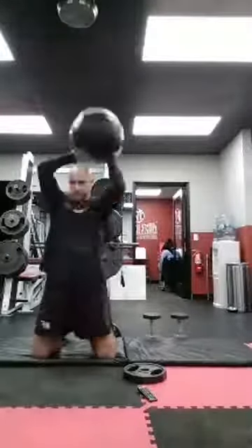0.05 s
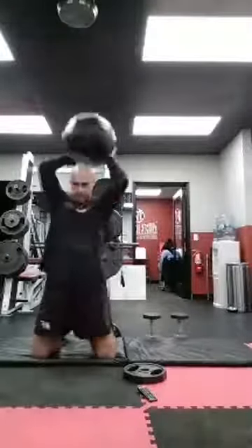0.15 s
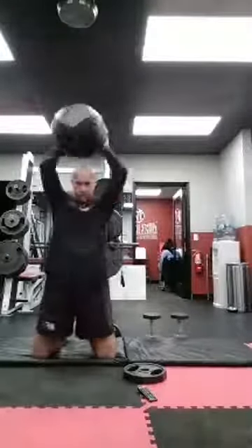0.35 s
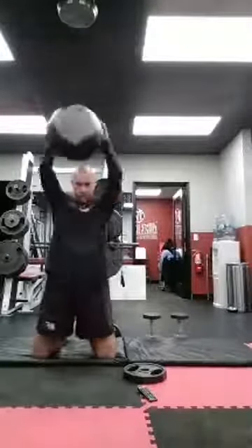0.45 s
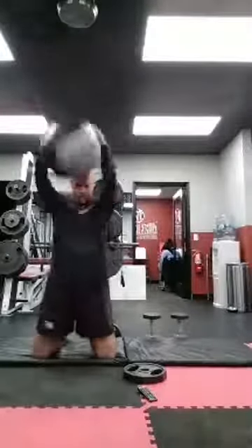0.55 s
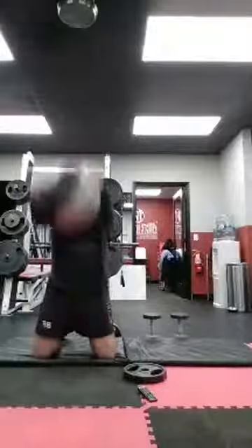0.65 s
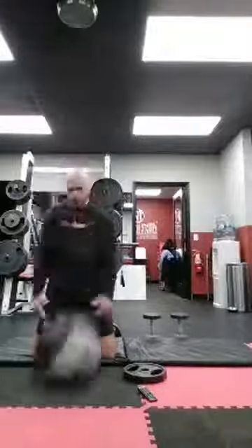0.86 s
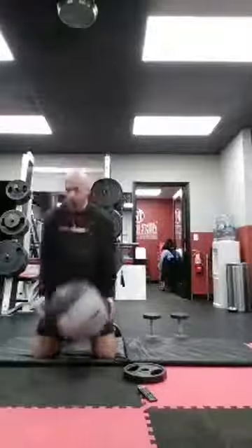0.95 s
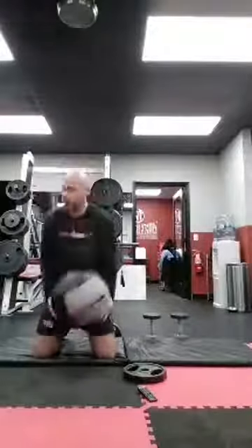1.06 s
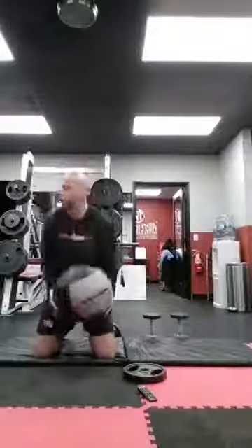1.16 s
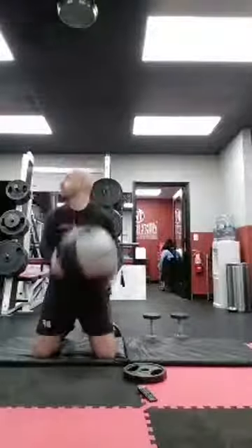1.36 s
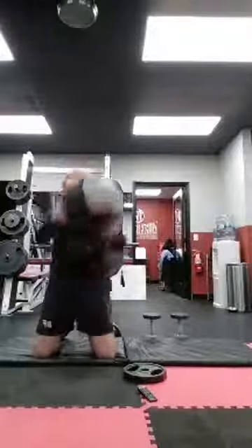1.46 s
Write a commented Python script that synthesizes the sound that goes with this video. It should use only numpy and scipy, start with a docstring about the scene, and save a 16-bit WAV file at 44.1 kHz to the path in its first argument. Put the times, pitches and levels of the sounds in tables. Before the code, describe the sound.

A heavy sand-filled ball slams onto a mat close by, with a deep hollow knock at 0.2 seconds and a hard slapping thud at 0.4, both slightly overloaded. Lighter knocks follow near 0.6, 0.65 and 0.9 seconds, with sharp snaps and shifting sand, the first with a thin high ping. Soft bumps settle by 1.2 seconds. The gym reverberates briefly over faint ventilation rumble and hum.

```python
"""In a gym, close to a small microphone, a heavy sand-filled ball is slammed onto a mat and knocks five times.
Each blow displaces a deep puff of air, excites the modes of the rubber shell, slaps the mat and shakes the
fill. Sharp snaps, one thin ping and a few soft bumps of the shell go with the blows. The gym answers with a
short bright reverberation over the rumble and hum of its ventilation, and the hardest blows overload the
recorder."""
import sys
import numpy as np
from scipy import signal
from scipy.fft import rfft, irfft
from scipy.io import wavfile
from scipy.ndimage import uniform_filter1d

SR = 44100
rng = np.random.default_rng(int(sys.argv[2]) if len(sys.argv) > 2 else 0)


def to_wav(s):
    """Save 16-bit WAV."""
    ch = np.atleast_2d(s).T  # columns
    pcm = np.round(np.clip(ch, -1, 1) * 32767)  # PCM
    wavfile.write(sys.argv[1], SR, pcm.astype(np.int16))


N = 66150

# Modes of the rubber shell. Each row: frequency in Hz, relative level in dB, nominal T60 in seconds.
SHELL_MODES = [(108.4, -10.5, 0.18), (150.8, -11, 0.27), (187.3, -0.5, 0.1), (206, -8.5, 0.13),
               (336.7, -6, 0.11), (446, -7.5, 0.11)]
SHELL_SEND_DB = -6.5  # the shell's feed to the reverberation
CONTACT_RISE_S = 0.00062


def amp(db):
    """Amplitude ratio of a level in decibels."""
    return 10 ** (np.asarray(db) / 20)


def unit(x):
    """Normalisation to an rms of 1."""
    return x / np.sqrt(np.mean(x ** 2) + 1e-20)


def since(start):
    """Seconds elapsed since an onset, zero before it."""
    return np.maximum(np.arange(N) / SR - start, 0)


def curve_at(points, hz):
    """Interpolation along a logarithmic frequency axis."""
    f, value = np.transpose(points)
    return np.interp(np.log(hz + 1), np.log(f + 1), value)


def colour(x, spectrum):
    """Spectral shaping of a steady noise, at an rms of 1."""
    hz = np.fft.rfftfreq(N, 1 / SR)
    return unit(irfft(rfft(x) * amp(curve_at(spectrum, hz)) * (hz > 18), N))


def envelope(t, rise, hold, fade):
    """Linear rise, hold and exponential decay, timed in the units of t."""
    return np.minimum(t / rise, 1) * np.exp(-np.maximum(t - rise - hold, 0) / fade)


def modes(t, table, rise_s=0.002):
    """Free vibration: a sum of damped modes excited together."""
    ring = sum(amp(db - 60 * t / t60) * np.sin(2 * np.pi * hz * t) for hz, db, t60 in table)
    return ring * np.minimum(t / rise_s, 1)


def contact_noise(spectrum):
    """Dense vibration: coloured noise, evened out by a constant-amplitude copy of itself."""
    noise = colour(rng.standard_normal(N), spectrum)
    even = np.cos(np.angle(signal.hilbert(noise)))
    return unit(even + 0.63 * noise)


def ventilation(hum_fade_db_per_s=9.5):
    """Background noise: broadband rumble and hiss with a faint tonal hum, all slowly fading."""
    # Air noise spectrum. Each row: frequency in Hz, relative density in dB.
    air_spectrum = [(20, 17.5), (50, 2.5), (85, 1), (160, -10), (260, -10.5), (500, -11.5), (900, -14),
                    (1400, -19.5), (3000, -25.5), (7000, -20.5), (10000, -26.5), (14000, -30.5)]
    # Course of the air noise. Each row: time in seconds, level in dB.
    air_levels = [(0, -42.5), (.2, -46), (1.5, -49.5)]
    # Hum tones. Each row: frequency in Hz, initial rms level in dB.
    hum_tones = [(118.4, -54.5), (209, -53)]
    t = since(0)
    air = colour(rng.standard_normal(N), air_spectrum) * amp(np.interp(t, *np.transpose(air_levels)))
    hum = sum(amp(db) * np.sin(2 * np.pi * (hz * t + rng.random())) for hz, db in hum_tones)
    return air + np.sqrt(2) * hum * amp(-hum_fade_db_per_s * t)


def gym_response(delay_s=0.005, build_s=0.0071):
    """Impulse response: dense reflections build up, then each band decays at its own rate."""
    # Reverberation times. Each row: frequency in Hz, T60 in seconds.
    decay_times = [(50, 0.95), (170, 0.84), (500, 0.82), (1200, 0.7), (3000, 0.74), (7000, 0.73),
                   (13000, 0.56)]
    hz, t, bands = signal.stft(rng.standard_normal(N), SR, nperseg=256)
    bands *= amp(-60 * t / curve_at(decay_times, hz)[:, None])
    tail = signal.istft(bands, SR, nperseg=256)[1][:N]
    early_boost = 1 + amp(-0.5) * np.exp(-since(0) / 0.083)  # near walls and ceiling
    tail *= np.minimum(since(delay_s) / build_s, 1) * early_boost
    return tail / np.linalg.norm(tail)


def reverberation(x, tails=4, cycle_hz=29.97):
    """Diffuse field: the sound feeds several uncorrelated tails in turn."""
    turn = cycle_hz * since(0)
    feeds = np.array([np.maximum(np.cos(2 * np.pi * (turn - k / tails)), 0) for k in range(tails)])
    feeds /= np.linalg.norm(feeds, axis=0)
    return sum(signal.fftconvolve(x * feed, gym_response())[:N] for feed in feeds)


def thin_ping(start_s=0.577, hz=13313, db=-37, t60_s=0.26):
    """A single high, lightly damped mode, as of a small piece of metal."""
    return modes(since(start_s), [(hz, db, t60_s)])


def soft_bumps():
    """Weak excitation of the shell's modes: a second pulse just after the fifth blow, then soft contacts as the
    ball settles."""
    # Soft contacts. Each row: start in seconds, level in dB.
    bumps = [(0.915, -18.5), (.99, -26), (1.135, -36.5)]
    return sum(amp(db) * modes(since(start), SHELL_MODES) for start, db in bumps)


def sharp_snaps():
    """Broadband transients as the ball lands and rebounds."""
    # Snaps. Each row: start in seconds, level in dB, decay time in seconds.
    snaps = [(0.2008, -20.5, 0.0025), (0.232, -31, 0.014), (0.416, -20.5, 0.0031), (0.421, -17.5, 0.0052),
             (0.5762, -15.5, 0.0012), (0.65, -26, 0.003), (.66, -36, 0.004), (0.9082, -30.5, 0.0079),
             (0.9201, -19.5, 0.0082), (0.931, -24.5, 0.0077)]
    # Snap spectrum. Each row: frequency in Hz, relative density in dB.
    spectrum = [(800, -13.5), (1800, -1), (3000, -5), (4600, -1.5), (6000, -1.5), (8000, -1), (10500, -6.5),
                (13500, -9.5)]
    pulses = sum(amp(db) * envelope(since(start), CONTACT_RISE_S, hold=0.00039, fade=fade)
                 for start, db, fade in snaps)
    return contact_noise(spectrum) * pulses


def sand_fill(t, landing_s, grains_per_s=14000, spread_db=0.5, clump_db=1.5, clump_s=0.0013):
    """Shot noise: clumps of sand grains strike the inside of the shell."""
    # Grain spectrum. Each row: frequency in Hz, relative density in dB.
    spectrum = [(300, -9), (1200, -5), (2500, -2.5), (4500, -2.5), (7400, -0.5), (9000, -5.5),
                (10500, -12.5), (14000, -17)]
    grains = rng.standard_normal(N) * amp(spread_db * np.minimum(rng.exponential(1, N), 4))
    grains *= rng.random(N) < grains_per_s / SR
    clumps = unit(uniform_filter1d(rng.standard_normal(N), int(clump_s * SR)))
    hiss = colour(grains * amp(clump_db * clumps), spectrum)
    return hiss * envelope(t, landing_s, hold=0.026, fade=0.037)


def skin_slap(t):
    """Contact noise of the skin: a midrange burst that dies as the ball flattens."""
    # Slap spectrum. Each row: frequency in Hz, relative density in dB.
    spectrum = [(150, -25), (600, 1), (920, 4), (1150, -6), (1400, -1.5), (1750, -8), (2150, -8),
                (3200, -12.5), (7000, -37), (14000, -54)]
    return contact_noise(spectrum) * envelope(t, CONTACT_RISE_S, hold=0.0063, fade=0.036)


def hollow_knock(t, stretch):
    """Transient and resonance: a short noise burst with a hollow ring."""
    # Burst spectrum. Each row: frequency in Hz, relative density in dB.
    spectrum = [(200, -6.5), (480, -10.5), (600, 3), (670, 3.5), (770, 0), (900, -62), (1300, -9.5),
                (2500, -36)]
    # Ring modes. Each row: frequency in Hz, relative level in dB, T60 in seconds.
    hollow_modes = [(637.6, -3.5, 0.17), (675, -8, 0.24), (703, -9, 0.11), (758, -10, 0.11)]
    burst = contact_noise(spectrum) * envelope(t / stretch, CONTACT_RISE_S, hold=0.0034, fade=0.018)
    return burst + modes(t, hollow_modes)


def mat_thud(t):
    """Damped vibration of the struck mat: a low burst of noise."""
    # Thud spectrum. Each row: frequency in Hz, relative density in dB.
    spectrum = [(40, -9), (90, 1), (160, 1.5), (300, -0.5), (450, 2.5), (650, -7.5), (1200, -38),
                (4000, -48)]
    return contact_noise(spectrum) * envelope(t, CONTACT_RISE_S, hold=0.013, fade=0.023)


def air_push(start, rise_s, hz=36.3):
    """Air displaced from under the ball gives a damped pressure swing, which the walls reflect."""
    # Wall reflections. Each row: delay in seconds, relative level in dB.
    echoes = [(0.056, -14), (.083, -37), (0.124, -20.5)]
    pressure = np.zeros(N)
    for delay, db in [(0, 0), *echoes]:
        t = since(start + delay)
        pressure += amp(db) * np.cos(2 * np.pi * hz * t) * envelope(t, rise_s, hold=0, fade=0.024)
    return pressure


def blow(start, push_db, shell_db, thud_db, knock_db, slap_db, fill_db, landing_s, echo_db,
         ring_stretch, contact_stretch, push_rise_s):
    """Impact excitation: the direct sound of one blow and its feed to the reverberation."""
    t = since(start)
    shell = modes(t, [(hz, db, t60 * ring_stretch) for hz, db, t60 in SHELL_MODES])
    layers = np.array([amp(shell_db) * shell,
                       amp(thud_db) * mat_thud(t / contact_stretch),
                       amp(knock_db) * hollow_knock(t, contact_stretch),
                       amp(slap_db) * skin_slap(t / contact_stretch),
                       amp(fill_db) * sand_fill(t, landing_s)])
    sends = amp([SHELL_SEND_DB, -3.5, -14.5, -6, -3.5])  # one per layer
    direct = amp(push_db) * air_push(start, push_rise_s) + layers.sum(0)
    return np.array([direct, amp(echo_db) * (sends @ layers)])


def scene():
    """Superposition of direct sound, reverberation and background noise."""
    # Impacts. Each row: start in seconds; levels of push, shell, thud, knock, slap and fill in dB;
    # landing time of the fill in seconds; reverberation gain in dB; stretch factors for the shell's
    # ring and for the contact; rise of the push in seconds.
    blows = [(0.2016, -5.5, -7, -22, -10.5, -23.5, -26, 0.0025, -1, 0.86, 0.79, 0.0015),
             (0.4159, -6, -28.5, -11, -20, -9.5, -19.5, .004, -3.5, 0.99, .75, 0.00073),
             (.573, -20, -21, -24.5, -57, -56, -24.5, 0.0034, 3, 0.9, 1.58, 0.0014),
             (0.6452, -10.5, -21.5, -23, -55, -26, -25.5, 0.0063, 1, 1.06, 1.26, 0.0069),
             (.909, -13.5, -17.5, -22.5, -32.5, -27, -26, 0.0081, -2.5, 1.23, 1.04, .005)]
    direct, sent = sum(blow(*row) for row in blows)
    snaps, bumps, ping = sharp_snaps(), soft_bumps(), thin_ping()
    sent = sent + amp(-2) * snaps + amp(SHELL_SEND_DB) * bumps + amp(-9) * ping
    return (direct + snaps + bumps + ping + reverberation(sent) + ventilation())[None]


def record(dry, ceiling=0.78, knee=3.5, cutoff_hz=14250):
    """Soft saturation: the recorder rounds off the highest peaks, then limits the band."""
    rounded = dry / (1 + abs(dry / ceiling) ** knee) ** (1 / knee)
    lowpass = signal.firwin(401, cutoff_hz, window=("kaiser", 9), fs=SR)
    return signal.oaconvolve(rounded, lowpass[None], "same")


dry = scene()
out = record(dry)
to_wav(out)
```